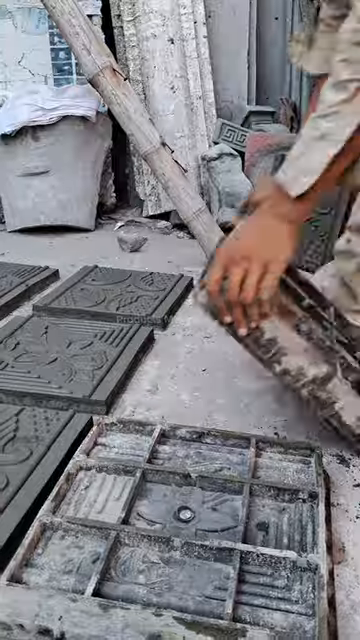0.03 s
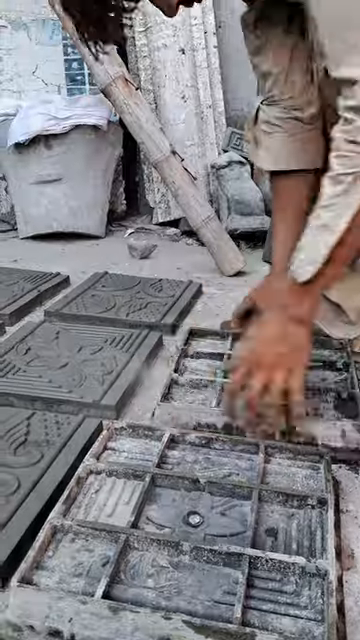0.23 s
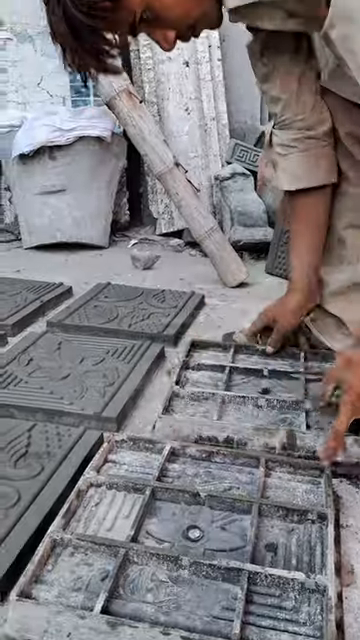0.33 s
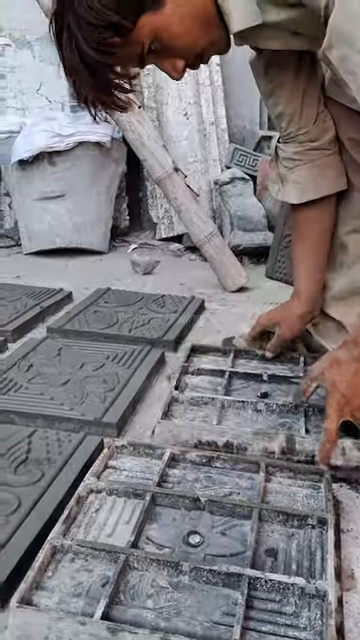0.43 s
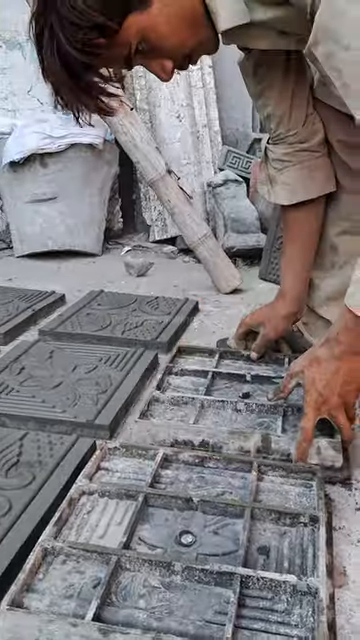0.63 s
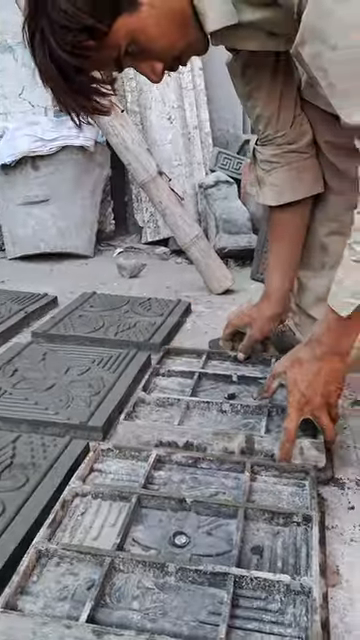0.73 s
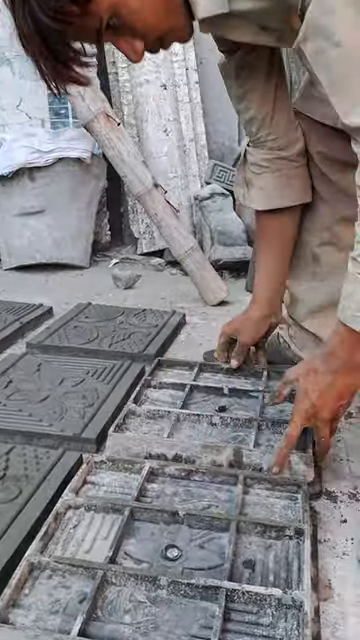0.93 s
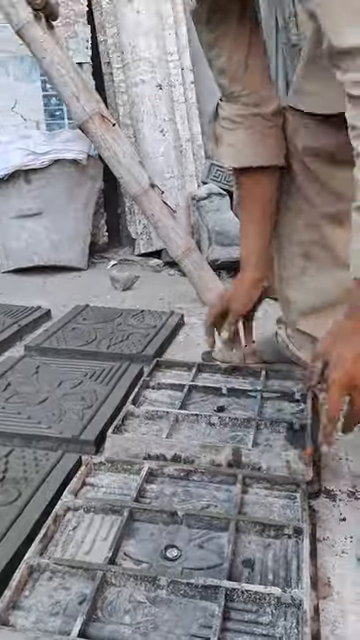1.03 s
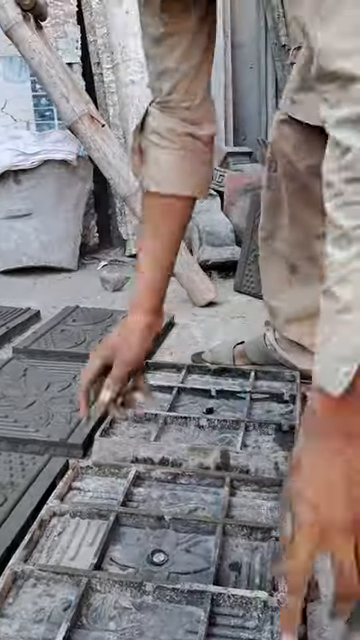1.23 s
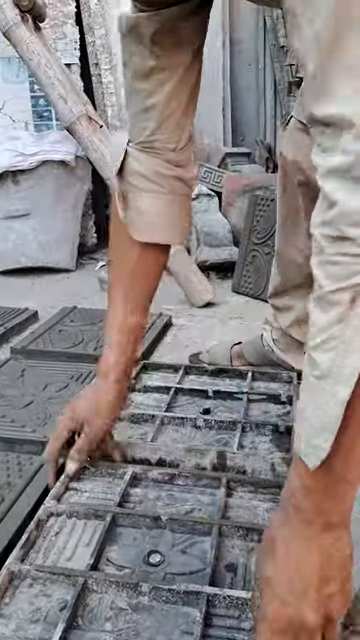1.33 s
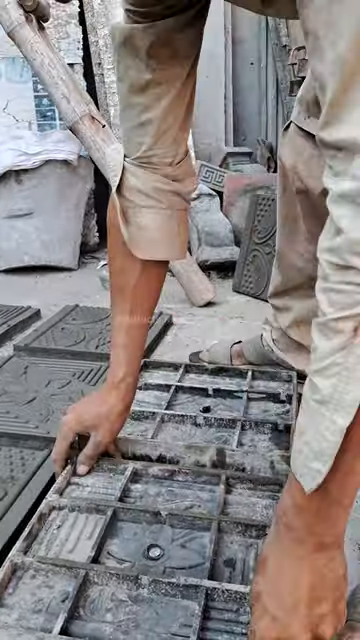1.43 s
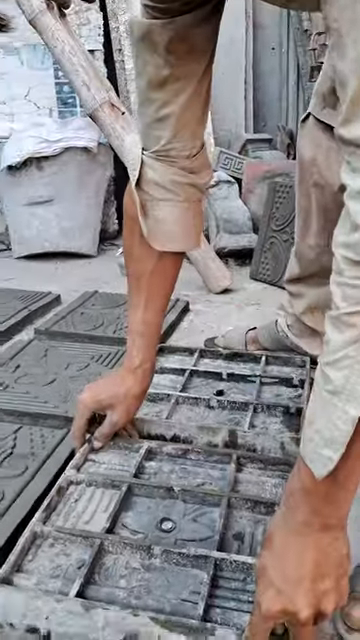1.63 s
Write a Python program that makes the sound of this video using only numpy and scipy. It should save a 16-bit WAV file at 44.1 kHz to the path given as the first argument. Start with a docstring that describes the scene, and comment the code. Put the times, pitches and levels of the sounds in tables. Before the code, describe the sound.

In a workshop yard, a filled mold is set down near the microphone with a brief thud and clack. Hands and sandals then scuff softly on sand, while machinery hums faintly in the distance.

```python
"""A low rumble, a wash of noise and a distant machine hum fill a workshop yard; hands and sandals scuff.
A heavy, filled tile mold lands close by on the gritty floor: the impact excites damped modes, a thud
from its mass and a clack from its stiff frame, and crushes a little grit. It settles and is nudged into
line, friction turning sand grains into faint scuffs and rubs. Walls and stacked tiles add a short tail."""
import sys
import numpy as np
from scipy import signal
from scipy.fft import rfft, irfft
from scipy.io import wavfile

SR = 44100
rng = np.random.default_rng(int(sys.argv[2]) if len(sys.argv) > 2 else 0)


def generate_wav(signal):
    """Clip the signal to [-1, 1] and save it as 16-bit WAV at the path in sys.argv[1]."""
    frames = np.transpose(np.atleast_2d(signal))
    scaled = np.clip(frames, -1, 1) * 32767
    pcm = np.round(scaled).astype(np.int16)
    wavfile.write(sys.argv[1], SR, pcm)


N = 74970
TIME = np.arange(N) / SR
HZ = np.fft.rfftfreq(N, 1 / SR)


def amp(db):
    """Amplitude ratio of a level in decibels."""
    return 10 ** (np.asarray(db) / 20)


def unit(x):
    """Normalisation to rms 1."""
    return x / np.sqrt(np.mean(x ** 2) + 1e-20)


def read(points, hz=HZ):
    """Interpolation of a table on a log-frequency axis."""
    f, value = np.transpose(points)
    return np.interp(np.log(hz + 1), np.log(f + 1), value)


def sides(db):
    """Level-difference panning: two gains, the left db above the right."""
    return amp(np.array([[.5], [-.5]]) * db)


def noise():
    """White noise in two independent channels."""
    return rng.standard_normal((2, N))


def correlate(pair, correlation):
    """Partial coherence: the right channel takes a share of the left at constant power."""
    left, right = pair
    share = np.clip(correlation, -1, 1)
    return np.array([left, share * left + np.sqrt(1 - share ** 2) * right])


def colour(pair, spectrum, correlation, pan_db=0):
    """Spectral shaping of two independent signals, with a set correlation and balance; rms 1."""
    shaped = correlate(rfft(pair), correlation) * amp(read(spectrum)) * sides(pan_db)
    return unit(irfft(shaped, N))


def resonance(x, hz, half_width_hz):
    """A resonance passes a narrow band of its excitation; rms 1."""
    return unit(irfft(rfft(x) / (1 + ((HZ - hz) / half_width_hz) ** 2), N))


def grains(per_s=7000, spread_db=1):
    """Friction on sand is a random train of tiny impacts, a few of them larger."""
    size = amp(spread_db * np.minimum(rng.exponential(1, (2, N)), 4))
    return size * np.sign(noise()) * (rng.random((2, N)) < per_s / SR)


def stroke(start, length, rise, sag_db=-2):
    """Envelope of a sliding contact: linear rise, sagging hold, exponential release."""
    t = np.maximum(TIME - start, 0)
    fall = 0.33 * length
    hold = amp(sag_db * np.minimum(t / length, 1))
    release = np.exp(-np.maximum(t - length + fall, 0) / fall)
    return np.minimum(t / rise, 1) * hold * release


def wash():
    """Broadband yard noise; as in a diffuse field, left and right are coherent only in the bass."""
    # noise spectrum (frequency [Hz], relative density [dB])
    spectrum = [(20, -19.5), (150, 9), (330, 3.5), (480, -1), (750, -1), (1050, -2), (1600, -5),
                (2100, -7.5), (2800, -8), (3400, -14), (5000, -14.5), (6300, -21), (7800, -20),
                (9300, -30.5), (13000, -24.5), (16000, -38)]
    # balance (frequency [Hz], left minus right [dB])
    balance = [(100, -12), (600, 0), (1300, -5.5), (2500, -6), (5000, -7), (9000, -1), (14000, 7)]
    # left-right likeness (frequency [Hz], correlation [1])
    correlation = [(50, 0.97), (200, 0.18), (600, 0.048), (1500, 0), (15000, 0)]
    # slow drift (time [s], level [dB])
    levels = [(0, -46), (.12, -47.5), (.3, -49.5), (.4, -52), (.52, -51.5), (.7, -50), (.86, -52.5),
              (1.0, -49.5), (1.15, -50), (1.38, -48), (1.5, -47.5), (1.7, -48.5)]
    envelope = amp(np.interp(TIME, *np.transpose(levels)))
    return envelope * colour(noise(), spectrum, read(correlation), read(balance))


def rumble():
    """Low-frequency noise ebbs and swells under slow amplitude modulation."""
    # noise spectrum (frequency [Hz], relative density [dB])
    spectrum = [(20, -10), (45, -4), (70, -4.5), (100, -12.5), (130, 6), (170, -9), (250, -16), (500, -46),
                (2000, -53)]
    # ebb and swell (time [s], level [dB])
    levels = [(0, -37.5), (.06, -40), (.14, -42.5), (.3, -51), (.42, -46.5), (.6, -51.5), (.88, -55.5),
              (1.0, -56), (1.15, -50.5), (1.3, -45.5), (1.38, -44), (1.55, -47), (1.7, -46.5)]
    envelope = amp(np.interp(TIME, *np.transpose(levels)))
    return envelope * colour(noise(), spectrum, correlation=0.57)


def machine_hum():
    """Distant machinery: narrow-band noise is heard as wavering tones."""
    # machine tones (frequency [Hz], level [dB])
    tones = [(335, -57.5), (890, -66), (1042, -64.5), (1190, -70), (1558, -67), (2300, -71)]
    return sum(amp(db) * resonance(noise(), hz, half_width_hz=16.5) for hz, db in tones)


def rubs(rise_s=0.011, pan_db=-5.5):
    """Frictional excitation: grains dragged under a hand or the rim drive one resonance per rub."""
    # light rubs (start [s], length [s], level [dB], centre [Hz], half width [Hz])
    strokes = [(-.01, 0.13, -58.5, 4470, 725), (0.04, 0.11, -56.5, 1580, 50),
               (0.152, 0.092, -55, 2780, 150), (0.644, 0.04, -66.5, 4800, 400),
               (0.701, 0.038, -59.5, 4640, 160), (1.156, 0.021, -43, 1820, 120),
               (1.24, 0.023, -44, 1960, 250), (1.246, .02, -46.5, 3050, 200)]
    return sides(pan_db) * sum(amp(db) * stroke(start, length, rise_s) * resonance(grains(), hz, width)
                               for start, length, db, hz, width in strokes)


def scuffs(treble_hz=4630):
    """Sliding friction: sand grinds under each stroke, over the low push of the mold's shifting weight."""
    # scuffs (start [s], length [s], rise [s], grit level [dB], treble gain [dB], push level [dB])
    strokes = [(0.146, 0.078, 0.0064, -47, -5.5, -45.5), (0.195, 0.077, 0.016, -49, -1, -41.5),
               (.285, 0.041, 0.015, -56, -3, -39.5), (0.532, 0.066, 0.018, -54.5, -6, -46.5),
               (0.693, .035, 0.0068, -51.5, -12, -42), (0.734, 0.078, 0.0085, -53.5, -15, -52),
               (0.933, 0.0091, 0.0048, -51, -11, -49.5), (1.037, 0.057, 0.0059, -66.5, 5.5, -45),
               (1.139, 0.05, 0.02, -44, 0.5, -42), (1.228, .018, 0.0031, -35, -8.5, -37),
               (1.239, 0.015, 0.0011, -40, -4.5, -44), (1.259, 0.05, 0.0053, -49, -6, -56),
               (1.292, 0.077, 0.012, -52.5, -2.5, -52.5), (1.564, 0.076, 0.014, -59, -15, -41),
               (1.671, 0.022, .008, -47, -13, -38)]
    # grinding sand (frequency [Hz], relative density [dB])
    grit_spectrum = [(100, 9.5), (400, -7), (1000, 2.5), (1500, 1), (1900, 3.5), (2800, 3.5), (3700, -6.5),
                     (5200, 0), (7500, -4), (10000, -4), (13000, -7.5), (16000, -5)]
    # its balance (frequency [Hz], left minus right [dB])
    balance = [(400, 1.5), (1000, -1.5), (2200, -6.5), (5000, -4.5), (9000, 0), (14000, 2.5)]
    # its left-right likeness (frequency [Hz], correlation [1])
    correlation = [(300, 1), (700, 0.74), (2000, 0.0019), (4000, 0.091), (15000, 0)]
    # shifting weight (frequency [Hz], relative density [dB])
    push_spectrum = [(25, -26), (70, 4), (135, 9.5), (230, 0), (400, -12), (1000, -19), (4000, -76)]
    grit = colour(grains(), grit_spectrum, read(correlation), read(balance))
    treble = irfft(rfft(grit) * HZ ** 4 / (HZ ** 4 + treble_hz ** 4), N)
    push = colour(noise(), push_spectrum, correlation=1)
    out = np.zeros((2, N))
    for start, length, rise, grit_db, treble_db, push_db in strokes:
        shelved_grit = grit + (amp(treble_db) - 1) * treble
        out += stroke(start, length, rise) * (amp(grit_db) * shelved_grit + amp(push_db) * push)
    return out


def damped_mode(start, hz, db, t60, rise_s):
    """Free vibration: a mode is pushed smoothly into motion and decays exponentially."""
    t = np.maximum(TIME - start, 0)
    onset = (1 - np.exp(-t / rise_s)) ** 2
    decay = np.exp(-np.log(1000) * t / t60)
    return amp(db) * onset * decay * np.sin(2 * np.pi * hz * t)


def landing():
    """Modal superposition: each impact sets the mold's mass thudding and its frame clacking."""
    # the mold meets the ground (time [s], thud gain [dB], clack gain [dB])
    contacts = [(0.2447, 10.5, -11), (.2478, -17, 1), (0.2674, -11, -31), (0.2977, -32, -44)]
    # modes of the loaded mold on the ground (frequency [Hz], relative level [dB], t60 [s])
    thud_modes = [(157, -25, 0.14), (189.7, -8.4, 0.055), (234.5, -20, .08), (344, -4.5, 0.013),
                  (390.6, -32.5, .07), (583, -27.5, 0.052), (743, -18.5, 0.024)]
    # modes of the stiff frame (frequency [Hz], relative level [dB], t60 [s], left minus right [dB])
    clack_modes = [(1115, -19.5, 0.018, -9.5), (1250, -26.5, 0.022, -13), (1483, -17.5, 0.016, 6),
                   (2390, -19.5, 0.012, -10), (3000, -33, 0.0069, -7)]
    out = np.zeros((2, N))
    for start, thud_db, clack_db in contacts:
        for hz, db, t60 in thud_modes:
            out += damped_mode(start, hz, db + thud_db, t60, rise_s=0.0019)
        for hz, db, t60, pan_db in clack_modes:
            out += sides(pan_db) * damped_mode(start, hz, db + clack_db, t60, rise_s=0.00018)
    return out


def crunch(peak_s=0.2476, rise_s=0.0022, decay_s=0.0029, db=-30.5):
    """Brittle fracture: grit under the rim gives a burst of noise as the full weight arrives."""
    # crushed grit (frequency [Hz], relative density [dB])
    spectrum = [(300, -2), (2000, 18), (3200, 10), (4300, -2), (6000, 2), (9000, -6), (12000, 5),
                (15500, -2)]
    t = TIME - peak_s
    envelope = amp(db) * np.exp(np.minimum(t / rise_s, -t / decay_s))
    return envelope * colour(noise(), spectrum, correlation=0, pan_db=1)


def yard_echoes(x, delay_s=0.01, db=-20):
    """Reverberation: walls and stacked tiles scatter the sound, and the bass lasts longest."""
    # reverberation time (frequency [Hz], t60 [s])
    decay_times = [(100, 0.24), (250, 0.21), (600, 0.098), (2000, 0.084), (10000, .1)]
    scatter = correlate(noise()[:, :SR // 2], 0.91)
    hz, t, spectra = signal.stft(scatter, SR, nperseg=256)
    decay = np.exp(-np.log(1000) * t / read(decay_times, hz)[:, None])
    tail = signal.istft(spectra * decay, SR, nperseg=256)[1]
    tail *= np.arange(tail.shape[1]) / SR > delay_s
    return amp(db) * signal.fftconvolve(x, tail / np.linalg.norm(tail[0]), axes=1)[:, :N]


def scene(bass_cut_hz=123):
    """Superposition of the near sounds, their echoes and the yard's background."""
    bass_cut = signal.butter(1, bass_cut_hz, "high", fs=SR)  # thins the deep bass of the landing thud
    mold = -signal.lfilter(*bass_cut, crunch() + landing())  # negative: it moves away from the listener
    near = mold + scuffs() + rubs()
    return near + yard_echoes(near) + wash() + rumble() + machine_hum()


def record(dry, cutoff_hz=15780):
    """Band limiting: a linear-phase low-pass removes the highest treble."""
    low_pass = signal.firwin(511, cutoff_hz, window=("kaiser", 9), fs=SR)
    return signal.oaconvolve(dry, low_pass[None], "same")


dry = scene()
out = record(dry)
generate_wav(out)
```